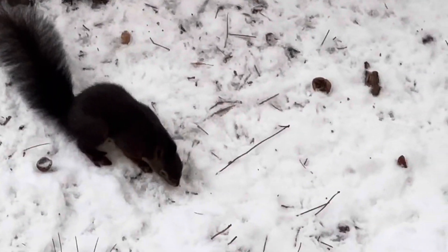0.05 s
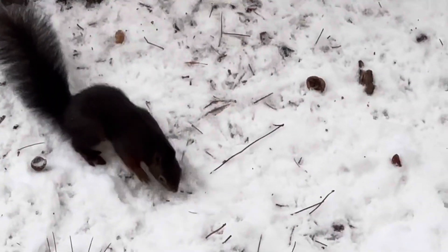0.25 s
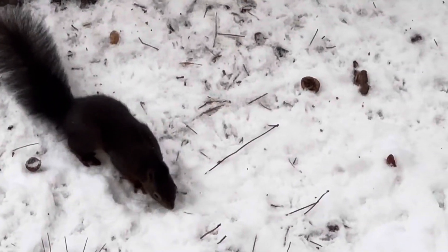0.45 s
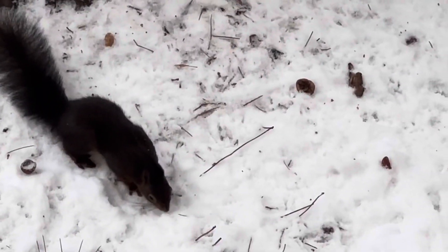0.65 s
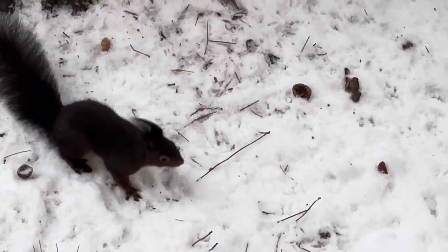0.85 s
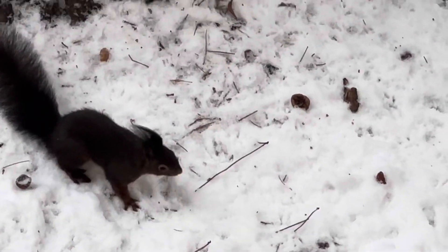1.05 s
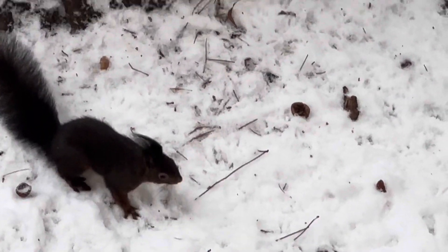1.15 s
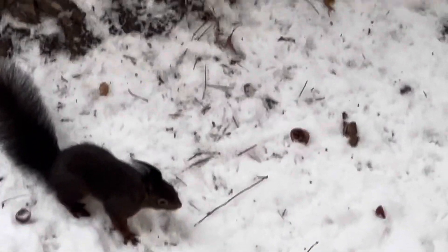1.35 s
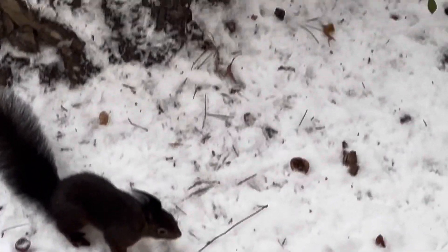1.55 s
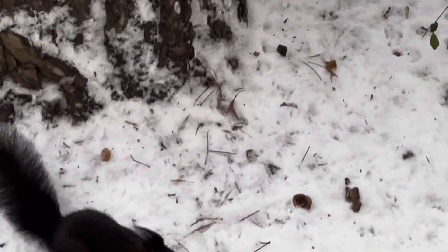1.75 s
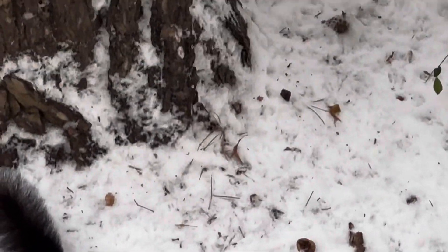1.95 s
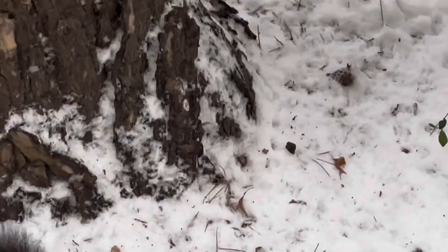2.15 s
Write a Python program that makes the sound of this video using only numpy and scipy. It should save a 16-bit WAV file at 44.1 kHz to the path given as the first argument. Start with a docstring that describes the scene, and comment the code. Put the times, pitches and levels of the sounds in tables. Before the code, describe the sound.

A squirrel rummages in crusted snow close to the microphone, making small crunches, rustles and twig ticks. It pauses, then rustles again more softly. Low wind bumps the microphone early on, over a faint distant outdoor rush.

```python
"""Squirrel in crusted snow

A squirrel rummages close to a hand-held camera: loose grains rustle, the crust crunches,
twigs and ice tick, and buried wood knocks. Behind it lie a distant rush, a faint drone and
low wind, which twice bumps the microphone. The two microphone openings ring near 10 kHz
and swing in opposite directions near 8 kHz."""
import sys
import numpy as np
from scipy import signal
from scipy.fft import rfft, irfft, next_fast_len
from scipy.io import wavfile
from scipy.ndimage import map_coordinates

SR = 44100
rng = np.random.default_rng(int(sys.argv[2]) if len(sys.argv) > 2 else 0)


def output_pcm(signal):
    """Save a mono or channel-first signal as 16-bit PCM at the path in sys.argv[1].

    Samples are clipped to [-1, 1] before scaling.
    """
    pcm = np.clip(np.atleast_2d(signal).T, -1, 1) * 32767
    wavfile.write(sys.argv[1], SR, np.round(pcm).astype(np.int16))


N = 97020  # 2.2 s

# tone of breaking snow grains: f/Hz, level/dB
GRAIN_TONE = [(300, -47), (900, -7), (1500, -1.5), (2600, 1), (4200, -2.5), (6500, 1), (10000, -7.5),
              (12500, -2), (15500, -1)]
# how alike the snow sounds left and right: f/Hz, likeness (1 = the same)
SNOW_LIKENESS = [(1500, .9), (3000, .93), (6000, .98), (8300, .99), (10000, .88), (12000, .96),
                 (15000, .85)]


def amp(db):
    """Turn decibels into a gain."""
    return 10 ** (np.asarray(db) / 20)


def unit(x):
    """Scale a sound to an average strength (rms) of 1."""
    return x / np.sqrt(np.mean(x ** 2) + 1e-20)


def along(points, hz):
    """Read between (f/Hz, value) points, with octaves evenly spaced."""
    freqs, values = np.transpose(points)
    return np.interp(np.log(hz + 1), np.log(freqs + 1), values)


def level(points):
    """Turn (t/s, level/dB) points into a gain for every sample."""
    return amp(np.interp(np.arange(N) / SR, *np.transpose(points)))


def filtered(x, response):
    """Multiply each frequency in x by response(hz)."""
    n = x.shape[-1]
    padded = next_fast_len(2 * n)
    hz = np.fft.rfftfreq(padded, 1 / SR)
    return irfft(rfft(x, padded) * response(hz), padded)[..., :n]


def causal(gain):
    """A filter with this gain that rings only after a sound, never before (minimum phase)."""
    cepstrum = irfft(np.log(gain))
    half = len(cepstrum) // 2
    return np.exp(rfft(np.r_[cepstrum[0], 2 * cepstrum[1:half]], len(cepstrum)))


def spread(pair, likeness):
    """Blend two unrelated signals into left and right with the given likeness, at rms 1."""
    angle = lambda hz: np.arccos(np.clip(along(likeness, hz), -1, 1)) / 2
    mid, side = filtered(pair, lambda hz: np.array([np.cos(angle(hz)), np.sin(angle(hz))]))
    return unit(np.array([mid + side, mid - side]))


def rush(tone, likeness):
    """Steady stereo noise with the given tone, at rms 1."""
    noise = filtered(rng.standard_normal((2, N)), lambda hz: amp(along(tone, hz)))
    return spread(noise, likeness)


def grains(size, per_s=1800, scatter_db=8, powder_share=0.36):
    """Tiny snow fractures of random but capped strength over a hiss of powder, in two channels."""
    hits = rng.random(size) < per_s / SR
    strength = amp(scatter_db * np.minimum(rng.standard_normal(size), 2))
    fractures = unit(hits * strength * rng.choice([-1, 1], (2, size)))
    powder = rng.standard_normal((2, size))
    return np.sqrt(1 - powder_share) * fractures + np.sqrt(powder_share) * powder


def add(out, start_s, sound):
    """Mix a sound into out, beginning at start_s."""
    part = out[:, max(round(start_s * SR), 0):][:, :sound.shape[-1]]
    part += sound[..., :part.shape[1]]


def far_drone(pitch_hz=116.6, width_hz=17.7):
    """A fuzzy far-off hum: a narrow band of low noise."""
    band = lambda hz: 1 / (1 + ((hz - pitch_hz) / width_hz) ** 2)
    return amp(-60) * unit(filtered(rng.standard_normal(N), band))


def distant_rush():
    """The steady rush of the outdoors, a touch louder on the left."""
    # tone of the rush: f/Hz, level/dB
    tone = [(40, -8.5), (75, 6), (150, 7), (200, 5.5), (330, -0.5), (480, -3), (700, -1.5), (920, 3),
            (1300, -4.5), (1700, -10), (2300, -19), (3200, -27), (4500, -35.5), (7000, -38), (10000, -60),
            (15000, -58)]
    # how alike left and right are: f/Hz, likeness
    likeness = [(100, 0.89), (250, 0.83), (500, 0.52), (950, 0.3), (1900, 0.98), (3800, 1), (7500, 0.9)]
    return amp(-56.5) * rush(tone, likeness) * amp([[0.2], [-0.2]])


def wind():
    """Low wind rumbles, strongest near the start."""
    # strength of the wind: t/s, level/dB
    gusts = [(0, -60), (.05, -45.5), (.11, -49.5), (.17, -46), (.38, -53.5), (.5, -57.5), (.8, -59.5),
             (.88, -59.5), (1.0, -61), (1.6, -60), (1.85, -60), (2.2, -57.5)]
    # tone of the rumble: f/Hz, level/dB
    tone = [(15, -29), (28, -10.5), (45, 2), (60, 7.5), (80, 0.5), (110, -9), (170, -18), (300, -31.5),
            (500, -64.5)]
    # how alike left and right are: f/Hz, likeness
    likeness = [(40, .88), (120, .85), (250, .7)]
    return level(gusts) * rush(tone, likeness)


def wind_bumps(top_hz=184, end_hz=45.6, fall_s=0.0086, low_cut_hz=33):
    """Wind bumps the microphone: soft, low thuds whose pitch sinks."""
    # each thud at its peak: t/s, level/dB, width/s, f/Hz
    thuds = [(0.2212, -21, 0.015, 82.5), (.450, -37.5, 0.012, 56.7)]
    out = np.zeros(N)
    for peak_s, db, width, peak_hz in thuds:
        t = np.clip(np.arange(N) / SR - peak_s, -.5, .5)
        pitch = np.minimum(end_hz + (peak_hz - end_hz) * np.exp(-t / fall_s), top_hz)
        cycles = np.cumsum(pitch) / SR
        swell = np.exp(-(t / (width * np.where(t < 0, 0.62, 1.25))) ** 2)  # quick rise, slower fade
        out -= amp(db) * swell * np.sin(2 * np.pi * (cycles - cycles[round(peak_s * SR)]))
    return filtered(out, lambda hz: hz ** 4 / (hz ** 4 + low_cut_hz ** 4))


def woods_echo(x, fade_s=.4):
    """The surroundings scatter sound into a soft tail that falls 60 dB in fade_s."""
    t = np.arange(SR // 2) / SR
    tail = spread(rng.standard_normal((2, len(t))), SNOW_LIKENESS) * np.exp(-np.log(1000) * t / fade_s)
    return signal.fftconvolve(x, tail / np.linalg.norm(tail[0]), axes=1)[:, :N]


def scrapes(width_octaves=.1):
    """Light sliding contact: grains in one narrow band swell and fade."""
    # faint scrapes: middle t/s, half length/s, level/dB, centre f/Hz
    slides = [(1.64, .035, -78, 2350), (2.03, .025, -79, 4450), (2.16, .045, -79, 4200)]
    out, t = np.zeros(N), np.arange(N) / SR
    for middle_s, half_s, db, centre in slides:
        band = lambda hz: np.exp(-.5 * (np.log2((hz + 1) / centre) / width_octaves) ** 2)
        swell = np.exp(-((t - middle_s) / half_s) ** 2)
        out += amp(db) * unit(filtered(grains(N)[0], band)) * swell
    return out


def rustle(clumps_per_s=90, clump_db=1.5):
    """Loose snow shifts and trickles in small clumps as the squirrel noses about."""
    # strength of the rustle: t/s, level/dB
    loudness = [(0, -63.5), (.10, -79), (.18, -66.5), (.205, -58.5), (.26, -73), (.308, -64.5), (.335, -63),
                (.38, -61), (.435, -63.5), (.455, -68), (.51, -65), (.53, -61), (.655, -70), (.70, -64),
                (.75, -76), (.82, -65.5), (.86, -54), (.93, -71.5), (1.10, -87.5), (1.45, -88),
                (1.475, -77.5), (1.545, -92), (1.565, -79.5), (1.68, -84.5), (1.71, -69), (1.76, -71),
                (1.80, -62.5), (1.86, -71.5), (1.91, -67.5), (2.0, -70), (2.05, -77), (2.2, -88)]
    snow = filtered(grains(N), lambda hz: amp(along(GRAIN_TONE, hz)))
    # glide smoothly from one random value to the next
    clumps = map_coordinates(rng.standard_normal(N // 50), [np.arange(N) * clumps_per_s / SR],
                             mode="wrap")
    return level(loudness) * spread(snow * amp(clump_db * clumps), SNOW_LIKENESS)


def knocks(rise_s=0.0004):
    """A buried twig and a thicker stick are jolted and ring briefly, damped by the snow."""
    # ringing tones of each piece: f/Hz, level/dB, time to fall 60 dB/s
    twig = [(2710, -17, 0.0078), (3140, -0.5, 0.028), (4440, -17, 0.017), (5650, 0.5, .041)]
    stick = [(1400, -14, .04), (1674, -11, .07), (2164, -9, .08), (2480, 0, .03), (2620, -6, .045),
             (3688, -20, .026)]
    out, t = np.zeros((2, N)), np.arange(SR // 5) / SR
    for start_s, db, tones in ((.3275, -48, twig), (.842, -43, stick)):
        ring = np.zeros(len(t))
        for hz, tone_db, fade_s in tones:
            fade = np.exp(-np.log(1000) * t / fade_s)
            ring += amp(tone_db) * fade * np.sin(2 * np.pi * (hz * t + rng.random()))
        add(out, start_s, amp(db) * ring * (1 - np.exp(-t / rise_s)))
    return out


def ticks(rise_s=.0003, crack_s=.00045, splinter_s=.003):
    """Twigs and ice snap: a very short crack, then a little quieter splintering."""
    # snaps: t/s, relative level/dB, treble tilt/(dB per octave)
    snaps = [(.044, -64, 1), (.063, -58, 3), (.121, -60, 3), (.148, -57, 0), (.193, -56, 0),
             (.3675, -49, 0), (.386, -53, 2), (.645, -62, 1), (.674, -54, 0), (.698, -53, 0),
             (.3265, -42, 0), (.3328, -37, 4), (.4423, -37, 6), (.5258, -52, 2), (.852, -52, 0),
             (1.4645, -64, -5), (1.554, -56, -4), (1.701, -56, 2), (1.7055, -56, 2), (1.785, -61, 0),
             (1.945, -60, 1), (1.966, -59, 1), (2.063, -54, -5), (2.113, -68, 0)]
    # tone of a snap before its tilt: f/Hz, level/dB
    tone = [(500, -20), (1500, -4), (3000, 0), (7000, -2), (10000, 1), (12000, -2), (16000, -4)]
    out, t = np.zeros((2, N)), np.arange(1024) / SR
    shape = (1 - np.exp(-t / rise_s)) * (np.exp(-t / crack_s) + amp(-15) * np.exp(-t / splinter_s))
    for start_s, db, tilt in snaps:
        colour = lambda hz: amp(tilt * np.log2(hz + 1) + along(tone, hz))
        crack = shape * spread(filtered(rng.standard_normal((2, len(t))), colour), SNOW_LIKENESS)
        add(out, start_s, amp(db - 10) * unit(crack))
    return out


def crunches(width_octaves=0.26, rise_s=0.00083):
    """A paw or the snout breaks the crust: a burst of grains around one broad resonance."""
    # the crust giving way: t/s, length/s, level/dB, centre f/Hz
    breaks = [(0.19, 0.0074, -72, 4850), (.313, 0.005, -47.5, 4170), (0.3238, 0.0053, -46, 6240),
              (0.363, 0.022, -53.5, 6700), (0.44, 0.0057, -56, 2470), (.482, 0.0039, -51.5, 3970),
              (0.487, 0.01, -57.5, 4960), (0.52, 0.011, -56, 3130), (.549, 0.012, -53, 1910),
              (0.594, .008, -55.5, 6500), (.598, 0.012, -57.5, 3120), (0.618, .008, -61.5, 2780),
              (0.67, 0.018, -58.5, 7340), (0.683, 0.013, -61, 6750), (0.742, 0.022, -68, 2820),
              (.800, 0.0031, -56, 2590), (0.833, .005, -55, 6950), (0.842, .005, -48, 1720),
              (0.8497, 0.014, -51, 2020), (0.852, 0.018, -75, 7400), (0.854, 0.027, -59, 12400),
              (0.869, 0.0035, -54, 8500), (1.552, 0.0027, -67, 2510), (1.701, 0.028, -61, 13000),
              (1.703, 0.0094, -62.5, 6250), (1.778, 0.019, -71, 2680), (1.808, 0.011, -59.5, 4400),
              (1.82, 0.0073, -58, 5800), (1.872, 0.012, -64, 2440), (1.91, 0.0072, -65, 5060),
              (1.889, 0.041, -66.5, 4040), (1.966, 0.011, -62, 5600)]
    out, t = np.zeros((2, N)), np.arange(SR // 10) / SR
    for start_s, length, db, centre in breaks:
        resonance = lambda hz: np.exp(-.5 * (np.log2((hz + 1) / centre) / width_octaves) ** 2)
        colour = lambda hz: resonance(hz) + amp(along(GRAIN_TONE, hz) - 11)
        burst = spread(filtered(grains(len(t), per_s=4000), colour), SNOW_LIKENESS)
        shape = (1 - np.exp(-t / rise_s)) * np.exp(-(t / length) ** 2)
        add(out, start_s, amp(db) * burst * shape)
    return out


def scene():
    """The squirrel in front of the background; only its ticks and crunches echo."""
    crust = ticks() + crunches()
    squirrel = crust + amp(-8.5) * woods_echo(crust) + knocks() + rustle() + scrapes()
    return squirrel + far_drone() + distant_rush() + wind() + wind_bumps()


def record(dry, top_hz=15950):
    """The microphone openings ring and shift left against right; the highest treble is cut off."""
    # tone of the openings: f/Hz, level/dB
    tone = [(20, 1.5), (6500, -1), (7400, 1.5), (8300, 2.5), (8900, 6), (9700, 8), (10800, -3), (12000, -7),
            (14000, -4.5), (16000, -3)]
    # how far the left wave runs ahead of the right: f/Hz, phase/rad
    left_lead = [(20, 0), (1900, 0), (3000, .3), (4500, .18), (6500, 0), (7200, .9), (7700, 2.3),
                 (8000, 3.0), (8450, 3.1), (8900, 2.0), (9700, .9), (11000, .2), (12800, -.05),
                 (14000, -1.1), (16000, -2.0)]
    shift = lambda hz: np.exp(.5j * along(left_lead, hz) * np.array([[1], [-1]]))
    picked_up = filtered(dry, lambda hz: causal(amp(along(tone, hz))) * shift(hz))
    return filtered(picked_up, lambda hz: 1 / (1 + (hz / top_hz) ** 160))


dry = scene()
out = record(dry)
output_pcm(out)
```